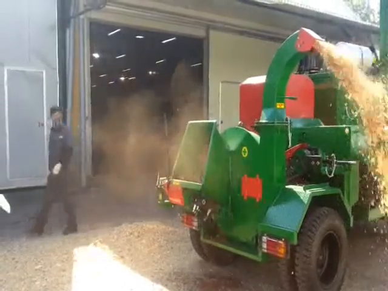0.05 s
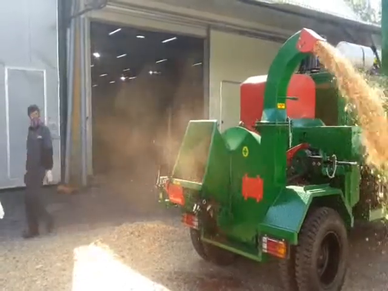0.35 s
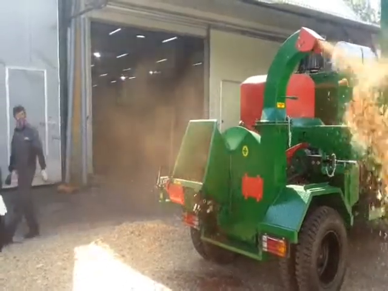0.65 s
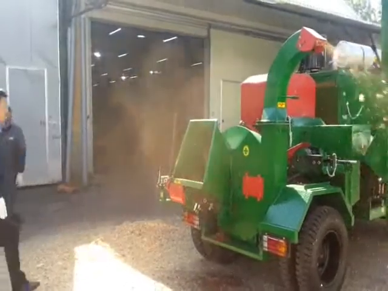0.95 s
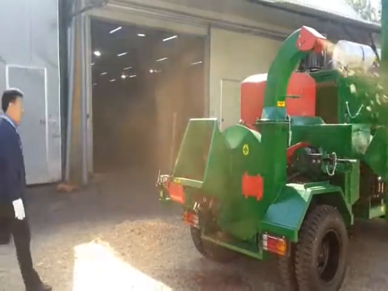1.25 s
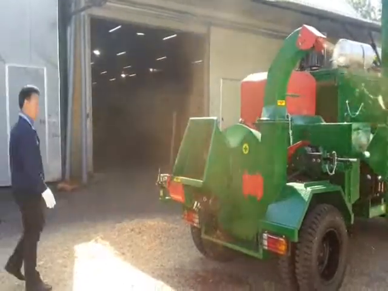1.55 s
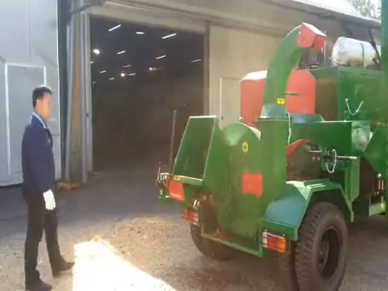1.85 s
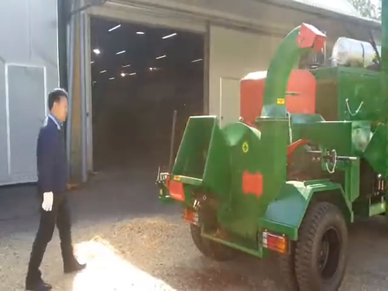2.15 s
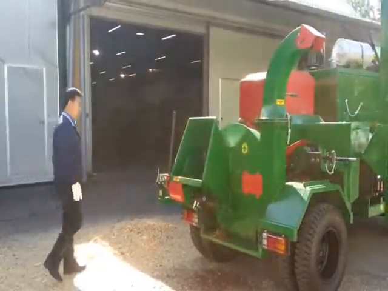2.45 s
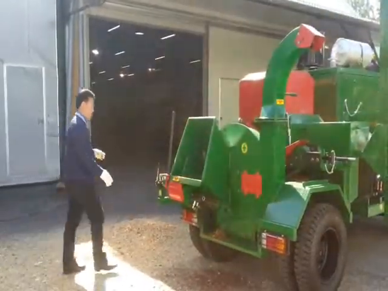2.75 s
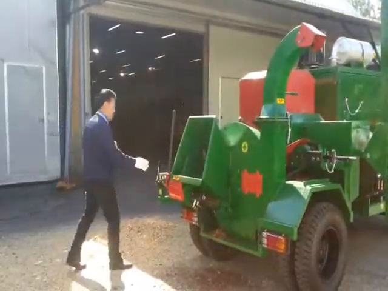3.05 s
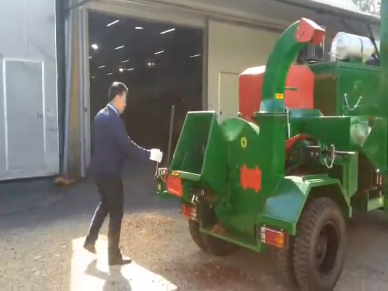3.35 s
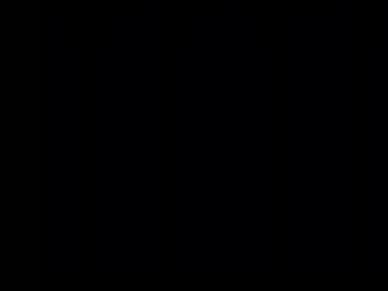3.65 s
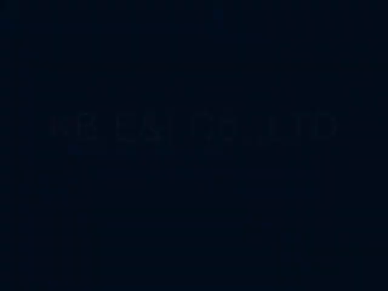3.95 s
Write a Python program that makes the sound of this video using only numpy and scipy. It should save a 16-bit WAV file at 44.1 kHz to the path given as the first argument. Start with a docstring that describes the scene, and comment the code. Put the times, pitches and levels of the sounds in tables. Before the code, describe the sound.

A wood chipper chops wood and sprays chips, then settles to an engine drone.

```python
"""A diesel wood chipper eats the end of a log in a yard. The knives chop and the engine sags under
the load; chips rush out of the spout and chunks clang on the modes of the steel housing. The stream
thins out, leaving the six-cylinder clatter and the drum's hum. Automatic gain control ducks the
engine under each loud burst."""
import sys
import numpy as np
from scipy import signal
from scipy.fft import rfft, irfft, next_fast_len
from scipy.io import wavfile
from scipy.ndimage import uniform_filter1d, map_coordinates

SR = 44100
rng = np.random.default_rng(int(sys.argv[2]) if len(sys.argv) > 2 else 0)


def int16_out(signal):
    """Quantize to a 16-bit WAV file."""
    q = np.round(np.clip(np.atleast_2d(signal).T, -1, 1) * 32767)
    wavfile.write(sys.argv[1], SR, q.astype(np.int16))


N = 176400
CYCLE_HZ, DRUM_HZ, BELT_HZ, PUMP_HZ = 15.69, 287.1, 296.2, 209.8  # at full shaft speed

# modes of the steel housing: pitch_hz, level_db, t60_s
HOUSING_MODES = [(812, -4.5, 0.28), (982, 2.5, .12), (1066, 7.5, 0.19), (1225, 4, 0.17), (1284, 0, 0.22),
                 (1610, -9, 0.39), (1703, -7, 0.17), (1850, -3, 0.16), (2025, -8, 0.092), (2328, -1.5, 0.1),
                 (2400, -1, 0.12), (2761, -0.5, 0.14), (2940, -6, .17), (3150, -12, .17), (3560, 2, 0.23),
                 (3700, -9, .2), (3900, -8, .2), (4160, -1, 0.142)]
# how much earlier each source reaches the left side: frequency_hz, lead_s
ENGINE_LEAD = [(300, 0.00019), (860, 0.00017), (1400, 0.00037)]
SPOUT_LEAD = [(500, 0.00008), (900, 0.00015), (2000, 0.00022), (3000, 0.000069)]


def knives(shaft):
    """Forced vibration: each stroke tears at the log, whose resonance rises as it gets shorter."""
    cut = [(0, -11.5, -24, 413), (.045, -13, -16, 430.6), (.075, -10.5, -23, 725), (.15, -5, -26, 770),
           (.21, -7, -24, 850), (.3, -9.5, -13.5, 945), (.41, -16, -12, 1079), (.48, -31, -17.5, 1126),
           (.6, -64, -38, 1160)]  # time_s, tear_db, howl_db, howl_hz
    log_spectrum = [(60, -50), (150, -43), (225, -12), (300, -12), (420, -5), (560, -6.5), (760, 7.5),
                    (1050, 0), (1400, -11.5), (3000, -10.5), (12000, -31)]  # frequency_hz, density_db
    howl_partials = [(.9, -1), (1, 0), (1.08, -4.5)]  # pitch_ratio, level_db
    tear_db, howl_db, howl_hz = curves(cut)
    stroke_hz, width_hz = DRUM_HZ / 4, 70
    stroke = unit(1 + np.exp(-(shaft * stroke_hz % 1)))
    tear = placed(rng.standard_normal((2, N)) * stroke, log_spectrum, SPOUT_LEAD)
    phase = 2 * np.pi * np.cumsum(howl_hz) / SR
    howl = sum(amp(db) * (wobble(width_hz) * np.cos(k * phase) + wobble(width_hz) * np.sin(k * phase))
               for k, db in howl_partials)
    return amp(tear_db) * tear + amp(howl_db) * unit(stroke * howl)


def spout():
    """Impact noise: an uneven stream of chips, with shattered chunks, scraping splinters and air thumps."""
    stream_levels = [(0, -10), (.2, -6.5), (.44, -7.5), (.6, -4.5), (.66, -8), (.8, -6.5), (.94, -8.5),
                     (1.03, -12), (1.13, -13), (1.26, 3), (1.4, -4), (1.6, -7.5), (1.75, -14.5),
                     (1.9, -19.5), (2.2, -20), (2.5, -28.5), (2.8, -18), (3, -34.5), (3.9, -27)]  # time_s, level_db
    # bursts: start_s, level_db, hold_s, t60_s
    chunks = [(.474, -5, 0.035, 0.17), (.551, -5, 0.013, 0.11), (.595, -7, 0.0088, .2),
              (.705, -9, .012, 0.22), (.822, -5.5, .064, 0.34), (.92, -14, 0.034, 0.19),
              (1.143, -7, 0.033, 0.52), (1.187, 2, .0067, 0.36), (1.495, -11, .041, .19),
              (1.548, -12, 0.01, 0.13), (2.708, -16, 0.04, .16)]
    splinters = [(.02, -16, .042, .3), (.245, -13, 0.016, .33), (.33, -21, 0.02, .2),
                 (.483, -11, .012, 0.21), (.68, -13, .04, 0.16), (.865, -13, 0.023, 0.2),
                 (1.64, -18.5, .011, 0.26), (1.977, -15, 0.0071, 0.4), (2.145, -20, 0.037, 1),
                 (2.635, -23.5, 0.059, 0.34), (2.704, -13.5, 0.059, .23), (.706, -12.5, 0.013, .12),
                 (2.738, -26, 0.011, 0.084)]
    thumps = [(.455, -40, 0.045, .1), (.695, -44, .03, .15), (.86, -51, 0.032, 0.17),
              (1.14, -31, 0.026, 0.19), (1.187, -24, 0.022, .06), (1.96, -44.5, 0.028, 0.11),
              (2.68, -43, .03, 0.13)]  # air pushed out with the big pieces
    # spectra: frequency_hz, density_db
    chip_spectrum = [(40, -53), (170, -49), (400, -25), (580, -11.5), (800, -3), (1200, -1), (1500, 0.5),
                     (2000, 0), (2400, -2.5), (2800, 0), (3300, -2.5), (4000, -2.5), (5200, -6.5),
                     (6800, -13.5), (9500, -16), (11800, -27), (13000, -70), (15000, -53)]
    chunk_spectrum = [(30, -34), (130, -44), (500, -11), (950, -4), (1500, -5.5), (2100, -2), (2700, 1.5),
                      (3250, -2), (3900, 1.5), (5200, -7), (7000, -14), (10000, -17), (14500, -29)]
    splinter_spectrum = [(40, -44), (500, -31), (1500, -15), (3000, -8), (4600, -0.5), (6500, -6.5),
                         (10000, -10.5), (14000, -32.5)]
    thump_spectrum = [(20, 7), (60, 5), (130, 6), (220, -6), (400, -38), (1000, -70)]
    level_db, = curves(stream_levels)
    stream = amp(level_db + 0.84 * wobble(40.2)) * placed(patter(), chip_spectrum, SPOUT_LEAD)
    return (stream + bursts(chunks, chunk_spectrum, patter())
            + bursts(splinters, splinter_spectrum, crackle())
            + bursts(thumps, thump_spectrum, rng.standard_normal((2, N))))


def bursts(rows, spectrum, grain, attack_s=0.0063):
    """Incoherent bursts add in power; each rises, holds and decays exponentially."""
    t, power = clock(), 0
    for start, db, hold, t60 in rows:
        rise = np.clip((t - start) / attack_s, 0, 1)
        decay_db = 60 * np.clip(t - start - hold, 0, 1) / t60
        power += (rise * amp(db - decay_db)) ** 2
    return np.sqrt(power) * placed(grain, spectrum, SPOUT_LEAD)


def crackle(hits_per_s=850, decay_s=0.00062, share=0.21):
    """Shot noise: tiny random chip impacts carry a share of the power of a hiss."""
    hits = (rng.random((2, N)) < hits_per_s / SR) * rng.exponential(1, (2, N))
    power = signal.lfilter([1], [1, -np.exp(-1 / (decay_s * SR))], hits)
    return rng.standard_normal((2, N)) * np.sqrt(1 - share + share * power / power.mean())


def patter(coupling=0.48, half_width_hz=22):
    """Resonance: chip impacts keep the housing's modes ringing."""
    def modes(f):
        return sum(amp(db) / (1 + 1j * (f - hz) / half_width_hz) for hz, db, _ in HOUSING_MODES)
    return filtered(shifting_resonances(crackle()), lambda f: 1 + coupling * modes(f))


def shifting_resonances(x, depth_db=2.4):
    """Response depends on the point of impact: as chips land on new spots, resonances come and go."""
    spectra = signal.stft(x, nperseg=1024)[2]
    patches = uniform_filter1d(rng.standard_normal(spectra.shape[1:]), size=3, axis=0)
    patches = unit(uniform_filter1d(patches, size=6, axis=1))
    return signal.istft(spectra * amp(depth_db * patches), nperseg=1024)[1][:, :N]


def housing(spread_octaves=0.05, attack_s=0.0011):
    """Damped free vibration: blocks ring the steel, and where they strike decides which modes lead."""
    clangs = [(.325, -3.5, 970), (.4, -15, 3700), (.492, -8, 2345), (.561, -12, 900), (.563, -6, 4160),
              (.709, -7, 1220), (.745, -4.5, 810), (.824, -9.5, 1220), (.83, -14, 2345), (.88, -7, 3850),
              (.846, -12, 1205), (.92, -10.5, 3535), (1.146, -8, 2780), (1.15, -10.5, 975),
              (1.186, 0, 2400), (1.208, -10, 2780), (1.236, -2, 970), (1.25, -3, 1220), (1.262, -4.5, 3700),
              (1.275, -8, 2780), (1.314, -3.5, 2780), (1.372, -4.5, 1220)]  # start_s, level_db, centre_hz
    out, t = np.zeros((2, N + SR)), np.arange(SR // 3) / SR
    hz, mode_db, t60 = np.transpose(HOUSING_MODES)[:, :, None]
    for start, db, centre_hz in clangs:
        weight = amp(mode_db) * (0.12 + np.exp(-(np.log2(hz / centre_hz) / spread_octaves) ** 2))
        phase = 2 * np.pi * (hz * t + rng.random(hz.shape))
        phase += 0.0097 * np.cumsum(rng.standard_normal(phase.shape), axis=1)  # drift widens each mode
        side_phase = .5 * rng.standard_normal((2, len(hz), 1))
        ring = (weight * amp(db - 60 * t / t60) * np.sin(phase + side_phase)).sum(axis=1)
        out[:, round(start * SR):][:, :len(t)] += ring * (1 - np.exp(-t / attack_s))
    return out[:, :N]


def engine(shaft, clatter_db=-23.5, roar_db=-16.5, whirr_db=-38):
    """Periodic excitation: six knocks a cycle pulse a clatter, roar and whirr; panels ring at harmonics."""
    cylinder_db = [0, -0.5, 0.4, -7, 0, 4.5]  # knock_db
    panel_orders = [(24, -48), (29, -43), (40, -42), (46, -39), (49, -32), (52, -40), (54, -31.8),
                    (57, -39), (68, -32.5), (73, -42), (81, -41), (118, -44), (120, -42), (149, -45),
                    (159, -42.5), (163, -40.5), (169, -44), (174, -44), (180, -47)]  # cycle_multiple, level_db
    # spectra: frequency_hz, density_db
    clatter_spectrum = [(100, -51), (220, -13.5), (330, -14), (560, -11), (800, -4), (1100, 3), (1500, -5),
                        (1850, 3.5), (2150, -6.5), (2450, -6), (2700, -5.5), (3200, -12), (4000, -2),
                        (6000, -39), (10000, -37), (12500, -61)]
    roar_spectrum = [(20, -28.5), (96, -35), (155, -27.5), (215, -19.5), (260, -13), (335, -5), (500, -6),
                     (650, -4.5), (790, -0.5), (1050, -3.5), (1400, -5), (2100, -14), (2600, -10.5),
                     (3100, -13), (4100, -15), (7000, -24.5), (10400, -32.5), (12500, -77), (14500, -70)]
    whirr_spectrum = [(1000, -48), (2250, -24.5), (2450, 2), (2580, 5), (2740, 1), (2950, -22), (5000, -57)]
    cycles = shaft * CYCLE_HZ
    firings = cycles * len(cylinder_db)
    strength = amp(cylinder_db)[firings.astype(int) % len(cylinder_db)]
    knock = unit(strength * (0.2 + np.exp(-(firings % 1) / 0.46)))  # decays towards a floor
    # the same noise repeats every cycle
    rattle = np.array([map_coordinates(noise, [cycles % 1 * SR / CYCLE_HZ])
                       for noise in rng.standard_normal((2, SR // 10))])
    clatter = amp(clatter_db) * placed(rattle * knock, clatter_spectrum, ENGINE_LEAD)
    roar_gain = amp(roar_db + 0.19 * wobble(12))
    pulsing = 1 + 0.089 * (knock - 1)
    roar = roar_gain * placed(rng.standard_normal((2, N)) * pulsing, roar_spectrum, ENGINE_LEAD)
    panels = sum(amp(db + 0.5 + 2.5 * wobble(18)) * tone(k * CYCLE_HZ, shaft) for k, db in panel_orders)
    flutter = amp(whirr_db + 9.5 * wobble(55))
    whirr = flutter * placed(rng.standard_normal((2, N)) * knock, whirr_spectrum, ENGINE_LEAD)
    return clatter + roar + panels + whirr


def drum_and_pump(shaft, belt_db=-10.5):
    """Beats: the drum's hum, weaker under load, interferes with the belt's tone; the pump whines."""
    hum_levels = [(0, -31), (.3, -37), (.44, -28.5), (.6, -30), (.9, -33.5), (1.08, -27.5), (1.4, -30),
                  (1.8, -27)]  # time_s, level_db
    pump_harmonics = [(1, -47), (2, -42), (3, -44.5)]  # harmonic_number, level_db
    hum_db, = curves(hum_levels)
    hum = tone(DRUM_HZ, shaft) + amp(belt_db) * tone(BELT_HZ, shaft)
    pump = sum(amp(db + 0.87 * wobble(16)) * tone(k * PUMP_HZ, shaft) for k, db in pump_harmonics)
    return amp(hum_db + 1.5 * wobble(14)) * hum + pump


def tone(hz, shaft):
    """Rotational tone: a stereo sine of rms 1 whose pitch follows the shaft speed."""
    lead_s = np.array([[along(ENGINE_LEAD, hz)], [0]])
    return np.sqrt(2) * np.sin(2 * np.pi * (hz * (shaft + lead_s) + rng.random()))


def placed(pair, spectrum, lead):
    """Coherence and arrival time place two independent signals as a coloured stereo pair of rms 1."""
    coherence = [(60, -0.2), (140, 0.26), (280, 0.5), (620, 0.5), (1100, 0.85), (2500, 0.08), (7000, 0.1)]  # frequency_hz, left_right_correlation
    def colour(hz):
        angle = np.arccos(along(coherence, hz)) / 2
        return amp(along(spectrum, hz)) * [np.cos(angle), np.sin(angle)]
    def delay(hz):
        return np.exp(1j * np.pi * hz * along(lead, hz) * np.array([[1], [-1]]))
    mid, side = filtered(pair, colour)
    return unit(filtered(np.array([mid + side, mid - side]), delay))


def filtered(x, response):
    """Linear filtering: the spectrum of x times a frequency response."""
    size = next_fast_len(N + SR // 4)
    return irfft(rfft(x, size) * response(np.fft.rfftfreq(size, 1 / SR)), size)[..., :N]


def amp(db):
    """Decibels to amplitude ratio."""
    return 10 ** (np.asarray(db) / 20)


def unit(x):
    """x at rms 1."""
    return x / np.sqrt(np.mean(x ** 2) + 1e-20)


def clock():
    """Sample times in seconds."""
    return np.arange(N) / SR


def along(points, hz):
    """Interpolation on a logarithmic frequency axis."""
    frequencies, values = np.transpose(points)
    return np.interp(np.log(hz + 1), np.log(frequencies + 1), values)


def curves(rows):
    """One value per sample for each column after the time."""
    times, *columns = np.transpose(rows)
    return [np.interp(clock(), times, column) for column in columns]


def wobble(rate):
    """Smooth random modulation, rate knots a second."""
    return map_coordinates(rng.standard_normal(N // 20), [clock() * rate], mode="wrap")


def scene():
    """Superposition: engine, drum and knives share one shaft; the treble leans left."""
    shaft_speed = [(0, .965), (.24, .94), (.48, .957), (.7, .978), (1.0, .996), (1.35, .997), (1.8, 1.0)]  # time_s, share_of_full_speed
    balance = [(60, 1), (150, -1), (400, 0.1), (1200, -1), (2200, 4), (4500, 3.6), (8000, 5.5),
               (13000, 2.5)]  # frequency_hz, left_minus_right_db
    speed, = curves(shaft_speed)
    shaft = np.cumsum(speed) / SR  # rotation, in seconds at full speed
    machine = engine(shaft) + drum_and_pump(shaft) + knives(shaft) + spout() + housing()
    return filtered(machine, lambda hz: amp(along(balance, hz) * np.array([[.5], [-.5]])))


def record(dry, threshold_db=-17.5, slope=0.79, attack_s=0.022, release_db_per_s=24.5, top_hz=14600):
    """Compression with quick attack and slow release, then a switch-off at the end and a band limit."""
    switch_off = [(0, 0), (3.919, 0), (3.924, -29), (3.955, -33), (3.98, -70), (4, -120)]  # time_s, gain_db
    power = np.abs(uniform_filter1d(np.mean(dry ** 2, axis=0), size=660))
    over_db = slope * np.maximum(10 * np.log10(power + 1e-12) - threshold_db, 0)
    release_db = release_db_per_s * clock()
    held_db = np.maximum.accumulate(over_db + release_db) - release_db
    pole = np.exp(-1 / (attack_s * SR))
    duck_db = signal.lfilter([1 - pole], [1, -pole], held_db, zi=held_db[:1])[0]
    ducked = np.clip(dry * amp(-duck_db), -1, 1)
    stop_db, = curves(switch_off)
    return filtered(ducked * amp(stop_db), lambda hz: hz < top_hz)


dry = scene()
out = record(dry)
int16_out(out)
```